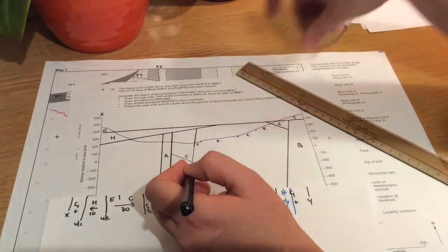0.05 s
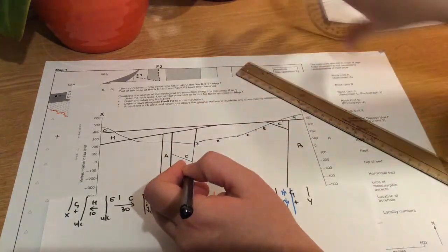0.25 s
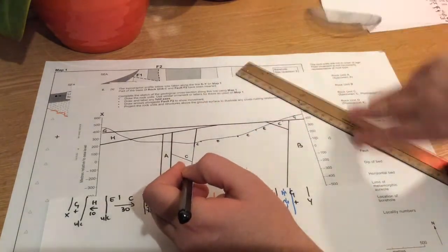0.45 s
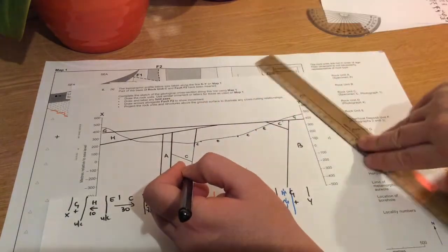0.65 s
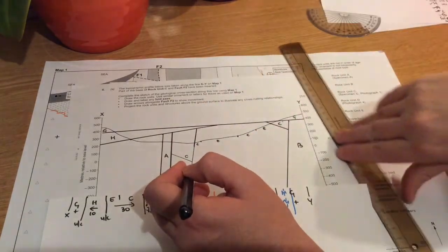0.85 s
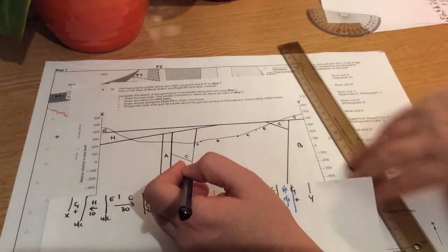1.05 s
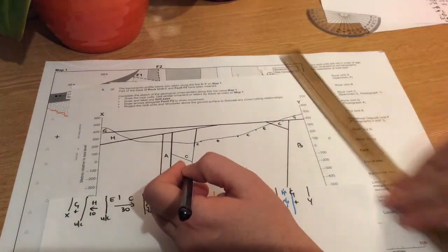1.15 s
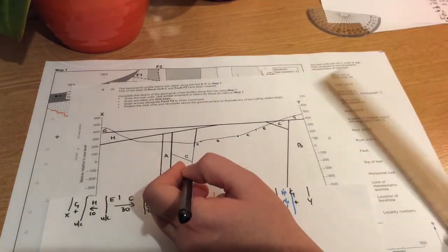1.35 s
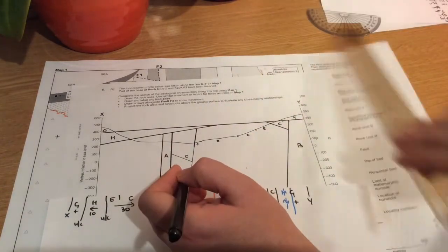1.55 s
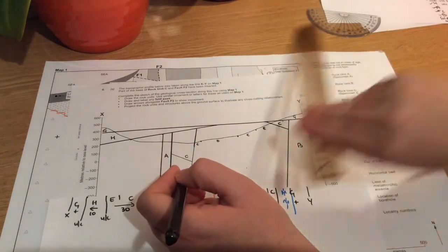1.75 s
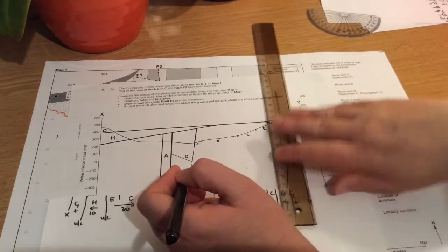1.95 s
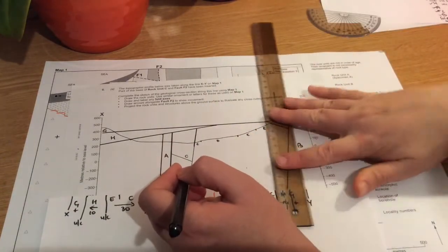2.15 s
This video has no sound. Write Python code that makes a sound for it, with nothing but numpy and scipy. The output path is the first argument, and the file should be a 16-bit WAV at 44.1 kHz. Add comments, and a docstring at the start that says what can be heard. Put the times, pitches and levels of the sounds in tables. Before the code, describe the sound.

Light plastic bounces on a desk before a wooden ruler rubs over paper and lands sharply.

```python
"""Over a faint room hum, a plastic protractor hits a wooden desk, bounces and clatters to rest.
Every bounce knocks the desk top and sets desk and plastic ringing; the heavy ones add a low thud.
A wooden ruler then slides over paper, its grainy friction exciting desk and ruler resonances. It is
dragged aside, lifted with a brief ring, swept back and laid flat with a bright slap.
The room is small and quiet, with a short, slightly dull reverb."""
import sys
import numpy as np
from scipy import signal
from scipy.io import wavfile

SR = 44100
rng = np.random.default_rng(int(sys.argv[2]) if len(sys.argv) > 2 else 0)


def generate_wav(signal):
    """Clip the signal to [-1, 1] and save it as 16-bit WAV at the path in sys.argv[1]."""
    frames = np.transpose(np.atleast_2d(signal))
    scaled = np.clip(frames, -1, 1) * 32767
    pcm = np.round(scaled).astype(np.int16)
    wavfile.write(sys.argv[1], SR, pcm)


N = 97020
TIME = np.arange(N) / SR
BAND_CENTRES_HZ = 30 * 2 ** np.arange(0, 9.2, .5)
LOW_HZ, MIDDLE_HZ, TREBLE_HZ = 900, 2700, 8100  # anchors of each event's three-point EQ

# room noise floor: (frequency [Hz], band level [dB])
ROOM_SPECTRUM = [(30, -101), (60, -83.5), (100, -83.5), (170, -76), (240, -75), (400, -74.5), (800, -78),
                 (1600, -86), (3500, -83), (8000, -82), (11500, -82.5), (15000, -94.5)]
# low hums: (frequency [Hz], level [dB])
HUMS = [(101, -73.5), (165, -72)]
# protractor hits: (time [s], low [dB], middle [dB], treble [dB], ring gain [dB],
# mode picked out by the contact point [Hz], its boost or cut [dB])
BOUNCES = [(0.2163, -15.5, -16, -20, -3.5, 6670, 9), (0.282, -22.5, -26.5, -33.5, -1.5, 930, 8),
           (0.3142, -41.5, -38, -43, 0.5, 1507, 23.5), (0.351, -46.5, -43.5, -45, 9, 6670, 4.5),
           (0.3702, -32, -30.5, -28, -1, 4324, 8), (0.3851, -36, -23.5, -28, -0.5, 2103, 3),
           (0.4025, -34.5, -31, -25, -1, 5900, 7.5), (0.4115, -39, -37, -27, 3.5, 4324, 5),
           (0.4557, -40, -38.5, -33, 6, 992, 12), (0.5077, -35, -23, -25.5, 0, 3330, 8.5),
           (0.5325, -40, -23.5, -22.5, -2, 4732, 8.5), (0.5435, -42.5, -31, -26, 0, 2825, -9),
           (0.559, -49, -47, -32, -5.5, 1507, 14.5)]
# colour of plastic knocking on the desk top: (frequency [Hz], band gain [dB])
KNOCK_SPECTRUM = [(60, -43), (110, -38.5), (170, -17.5), (300, -28.5), (480, -15.5), (950, -3.5),
                  (1600, -10.5), (3000, -4), (6000, -9), (10000, -8.5), (15000, -15.5)]
# the desk top's wooden note at 474 Hz, then the protractor's ringing modes,
# one list each: (frequency [Hz]), (gain [dB]), (T60 on the first bounce [s])
BOUNCE_RING_HZ = [474, 747, 930, 992, 1298, 1507, 2103, 2428, 2825, 3330, 3930, 4324, 4732, 5350, 5900,
                  6670, 7240, 7490, 8660, 10150, 11850, 13750]
BOUNCE_RING_DB = [-12, -9.5, -16.5, -19, -15, -17, -17.5, -19, -16, -13, -14, -20.5, -10, -23.5, -14.5, -13,
                  -16, -22, -14.5, -28, -29, -21]
BOUNCE_RING_T60_S = [0.13, 0.076, 0.32, 0.19, 0.07, 0.37, 0.17, 0.19, .14, 0.21, .15, 0.16, 0.12, 0.1, .1,
                     .1, .11, .11, 0.17, 0.12, 0.052, .1]
# heavy blows on the desk top: (time [s], level [dB])
THUDS = [(0.216, -40.5), (0.283, -65.5), (0.387, -51.5), (1.9216, -37.5)]
# ruler strokes: (time of full speed [s], attack [s], hold [s], release [s],
# low [dB], middle [dB], treble [dB], graininess [dB], ring gain [dB])
STROKES = [(0.669, .05, 0.017, 0.094, -98.5, -82, -69.5, 1.5, -7),
           (0.873, 0.28, 0.038, 0.051, -89.5, -80, -71.5, 2, -5),
           (0.993, 0.05, 0.034, 0.035, -85, -93, -72.5, 5, -13),
           (1.078, 0.024, 0.011, 0.043, -71.5, -67.5, -52.5, 2.5, -4),
           (1.193, 0.13, 0.1, 0.2, -84, -67, -64.5, 1.5, -6),
           (1.421, 0.024, 0.017, 0.054, -54.5, -52, -56, 5.5, -2.5),
           (1.456, 0.032, .017, 0.056, -66, -67.5, -49, 2.5, -4),
           (1.566, 0.025, 0.0041, 0.092, -70.5, -65.5, -73, 0.5, -3),
           (1.822, .06, 0.038, 0.063, -67, -62, -61.5, 3.5, 8),
           (1.91, 0.036, 0.049, 0.038, -57.5, -56.5, -53, 2.5, -2)]
# colour of wood rubbing on paper: (frequency [Hz], band gain [dB])
RUB_SPECTRUM = [(150, -15.5), (330, -19), (500, -8.5), (1000, -2), (1500, -10.5), (2300, -2), (4400, 2.5),
                (5700, 0.5), (8000, 3), (11500, -2), (15000, 0)]
# the desk top's low wooden note, then the ruler's resonances: (frequency [Hz], width [Hz], gain [dB])
DESK_AND_RULER_MODES = [(484, 28, -11.5), (1075, 83, -2.5), (1354, 76, -5.5), (1735, 77, -7.5),
                        (2236, 110, -0.5), (2680, 120, -4), (3165, 110, -4), (3840, 160, -1.5),
                        (4540, 180, -1.5), (6400, 160, -4), (7320, 310, -2.5), (8205, 200, -0.5),
                        (9200, 340, 2)]
# sharp pushes: (peak time [s], half-length [s], level [dB], pitch at the peak [Hz])
SWISHES = [(1.051, 0.0046, -60, 4300), (1.101, .019, -47, 4976), (1.163, .014, -56, 3614)]
# ruler touchdowns: (time [s], low [dB], middle [dB], treble [dB], noise T60 [s], ring gain [dB])
TAPS = [(1.4119, -41, -57, -71, 0.03, -8), (1.5755, -49, -49, -57.5, 0.062, -6.5),
        (1.7177, -53, -56, -52.5, 0.057, 10.5), (1.731, -56, -69, -55, 0.033, -15),
        (1.7773, -55, -57, -50.5, 0.12, 11), (1.9206, -35, -48, -43.5, 0.025, 5.5),
        (1.9243, -42.5, -19.5, -30, 0.013, -14.5), (1.9288, -34.5, -28.5, -36.5, 0.018, -12.5)]
# colour of the wooden taps: (frequency [Hz], band gain [dB])
TAP_SPECTRUM = [(60, -46), (170, -16), (300, -17), (600, -12), (1100, -4.5), (1600, -15), (2300, -8),
                (4300, 0.5), (5800, -4.5), (9500, -1), (15000, -16.5)]
# the ruler's edge snapping on the desk: (time [s], peak level [dB])
SNAPS = [(1.9271, -11.5), (1.9295, -24.5), (1.961, -27.5), (1.9723, -26.5)]


def from_db(db):
    """Decibels to gain."""
    return 10 ** (np.asarray(db) / 20)


def unit_rms(x):
    """Scale to unit rms."""
    return x / np.sqrt(np.mean(x ** 2) + 1e-20)


def db_at(spectrum, hz):
    """Read a spectrum on a log-frequency axis."""
    frequencies, db = np.transpose(spectrum)
    return np.interp(np.log(hz), np.log(frequencies), db)


def three_point_eq(low, middle, treble):
    """Three levels as a spectrum."""
    return [(LOW_HZ, low), (MIDDLE_HZ, middle), (TREBLE_HZ, treble)]


def decay(t60, t):
    """Exponential fade, 60 dB down after t60 seconds."""
    return np.exp(-np.log(1000) * t / t60)


def add(out, start, sound):
    """Mix a sound in at a start time in seconds."""
    i = int(start * SR)
    out[i:i + len(sound)] += sound[:N - i]


def shaped_noise(envelope, *spectra):
    """Enveloped noise, coloured in half-octave bands by the stacked spectra."""
    white = rng.standard_normal((2, len(envelope))) * (envelope + 1e-12)
    out = 0
    for k, hz in enumerate(BAND_CENTRES_HZ):
        edges = hz * 2 ** np.array([-.25, .25])
        band = signal.butter(2, edges, "band", fs=SR, output="sos")
        gain = from_db(sum(db_at(spectrum, hz) for spectrum in spectra))
        out += gain * np.sqrt(SR / 2 / np.ptp(edges)) * signal.sosfilt(band, white[k % 2])
    return out


def pitched_noise(hz, width_hz):
    """A band of noise at unit rms around a steady or gliding pitch."""
    smoothing = signal.butter(2, width_hz / 2, fs=SR, output="sos")
    waver = signal.sosfilt(smoothing, rng.standard_normal((2, N + SR)))[:, SR:]
    phase = 2 * np.pi * np.cumsum(hz * np.ones(N)) / SR
    return unit_rms(waver[0] * np.cos(phase) + waver[1] * np.sin(phase))


def resonate(x, hz, width_hz):
    """A resonance that keeps the rms of white noise."""
    radius = np.exp(-np.pi * width_hz / SR)
    zeros = np.sqrt((1 - radius ** 2) / 2) * np.array([1, 0, -1])
    poles = [1, -2 * radius * np.cos(2 * np.pi * hz / SR), radius ** 2]
    return signal.lfilter(zeros, poles, x)


def mode(hz, db, t60, t):
    """One decaying partial."""
    return from_db(db) * np.sin(2 * np.pi * hz * t) * decay(t60, t)


def room_tone():
    """A soft bed of noise with two wavering low hums."""
    bed = shaped_noise(np.ones(N), ROOM_SPECTRUM)
    return bed + sum(from_db(db) * pitched_noise(hz, width_hz=12) for hz, db in HUMS)


def protractor_clatter(scatter_db=1.5, settled_ring_share=.75, choke_above_db=-36.5, choke_t60_s=.057):
    """Each bounce knocks and sets desk and plastic ringing; the contact point colours the ring."""
    out, t = np.zeros(N), TIME[:SR // 2]
    body = np.hypot(decay(.033, t), from_db(-10.5) * decay(.17, t))  # fast drop, quiet tail
    attack = 1 - np.exp(-t / .00063)
    crack = 1 + from_db(4) * decay(.0093, t)
    knock_envelope = from_db(-2) * body * attack * crack
    for start, low, middle, treble, ring_db, contact_hz, contact_db in BOUNCES:
        eq = three_point_eq(low, middle, treble)
        # the ring shortens as the plate comes to lie flat
        ring_share = np.interp(start, [BOUNCES[0][0], BOUNCES[-1][0]], [1, settled_ring_share])
        ring = 0
        for hz, db, t60 in zip(BOUNCE_RING_HZ, BOUNCE_RING_DB, BOUNCE_RING_T60_S):
            accent_db = contact_db * np.exp(-((hz - contact_hz) / 45) ** 2)
            level_db = db + ring_db + accent_db + db_at(eq, hz) + scatter_db * rng.normal()
            ring += rng.choice([-1, 1]) * mode(hz, level_db, t60 * ring_share, t)
        # the next strong contact chokes this ring
        strong_hits = [at for at, _, mid_db, *_ in BOUNCES if at > start and mid_db > choke_above_db]
        next_hit = min(strong_hits, default=TIME[-1])
        choke = decay(choke_t60_s, np.maximum(start + t - next_hit, 0))
        add(out, start, ring * choke + shaped_noise(knock_envelope, KNOCK_SPECTRUM, eq))
    return out


def desk_thuds(hz=167.1, t60_s=.1, attack_s=.0025):
    """The desk top's low mode puts weight under the heavy blows."""
    out, t = np.zeros(N), TIME[:SR // 2]
    for start, db in THUDS:
        add(out, start, mode(hz, db, t60_s, t) * (1 - np.exp(-t / attack_s)))
    return out


def ruler_slides(grains_per_s=1100, edge_db=-20):
    """Paper fibres catch and slip under the wood: grainy friction that rings desk and ruler."""
    out = np.zeros(N)
    for peak, attack, hold, release, low, middle, treble, grain_db, ring_db in STROKES:
        eq = three_point_eq(low, middle, treble)
        fade_in = np.maximum(peak - TIME, 0) / attack
        fade_out = np.maximum(TIME - peak - hold, 0) / release
        speed = from_db(edge_db * (fade_in + fade_out))
        catches = np.interp(TIME * grains_per_s, np.arange(N), rng.standard_normal(N))
        friction = speed * unit_rms(from_db(grain_db * catches))
        out += shaped_noise(friction, RUB_SPECTRUM, eq)
        slips = friction * rng.standard_normal(N) + 1e-18
        for hz, width, db in DESK_AND_RULER_MODES:
            out += from_db(db + ring_db + db_at(eq, hz)) * resonate(slips, hz, width)
    return out


def ruler_swishes(octaves_per_s=-12.5):
    """Paper grain passing under the edge gives a breathy whistle that falls as the ruler slows."""
    out = np.zeros(N)
    for peak, half_length, db, hz in SWISHES:
        glide_time = np.clip(TIME - peak, -2 * half_length, 2 * half_length)
        pitch = hz * 2 ** (octaves_per_s * glide_time)
        swell = np.exp(-((TIME - peak) / half_length) ** 2)
        out += from_db(db) * swell * pitched_noise(pitch, width_hz=2050)
    return out


def ruler_taps(ring_trim_db=-4.5):
    """The wood touches down in short, paper-damped clacks that ring desk and ruler."""
    out, t = np.zeros(N), TIME[:SR // 4]
    for start, low, middle, treble, noise_t60, ring_db in TAPS:
        eq = three_point_eq(low, middle, treble)
        ring = 0
        for k, (hz, width, db) in enumerate(DESK_AND_RULER_MODES):
            ring_t60 = np.log(1000) / (np.pi * width)
            ring += (-1) ** k * mode(hz, ring_trim_db + ring_db + db + db_at(eq, hz), ring_t60, t)
        add(out, start, ring + shaped_noise(decay(noise_t60, t), TAP_SPECTRUM, eq))
    return out


def desk_drag(peak_s=1.465, half_length_s=.028, level_db=-58):
    """The desk top sings a brief wooden note as the ruler is dragged hard aside."""
    swell = np.exp(-((TIME - peak_s) / half_length_s) ** 2)
    return from_db(level_db) * swell * pitched_noise(hz=474, width_hz=27)


def ruler_lift(start_s=1.577, t60_s=.12, level_db=-49.5):
    """The ruler rings freely for an instant as it leaves the desk."""
    out = np.zeros(N)
    add(out, start_s, from_db(level_db) * pitched_noise(hz=2023, width_hz=174) * decay(t60_s, TIME))
    return out


def ruler_snaps(band_hz=(6500, 12100), t60_s=.0057):
    """Tiny, very bright clicks as the edge slaps down and settles."""
    out, t = np.zeros(N), TIME[:SR // 20]
    band = signal.butter(3, band_hz, "band", fs=SR, output="sos")
    for start, db in SNAPS:
        click = signal.sosfilt(band, rng.standard_normal(len(t)) * decay(t60_s, t))
        add(out, start, from_db(db) * click / np.abs(click).max())
    return out


def room_reverb(x, send_db=-13, t60_s=.3, predelay_s=.0065, high_cut_hz=7000):
    """The small room answers with a short, diffuse, slightly dull tail."""
    t = TIME[:SR // 2]
    tail = rng.standard_normal(len(t)) * decay(t60_s, t) * (t > predelay_s)
    high_cut = signal.butter(1, high_cut_hz, fs=SR, output="sos")
    tail = signal.sosfilt(high_cut, tail / np.linalg.norm(tail))
    return from_db(send_db) * signal.fftconvolve(x, tail)[:N]


def scene(low_cut_hz=115):
    """Close-up mono mix; the desk top radiates little below the low cut."""
    desk = protractor_clatter() + desk_thuds() + ruler_slides() + ruler_swishes()
    desk += ruler_taps() + desk_drag() + ruler_lift() + ruler_snaps()
    desk = signal.sosfilt(signal.butter(2, low_cut_hz, "high", fs=SR, output="sos"), desk)
    return (desk + room_reverb(desk) + room_tone())[None]


def record(dry):
    """The microphone softens the highest treble; the top is cut steeply."""
    mic_top_hz, cutoff_hz = 13500, 15600
    soft = signal.sosfilt(signal.butter(2, mic_top_hz, fs=SR, output="sos"), dry)
    return signal.sosfilt(signal.ellip(10, .3, 70, cutoff_hz, fs=SR, output="sos"), soft)


dry = scene()
out = record(dry)
generate_wav(out)
```